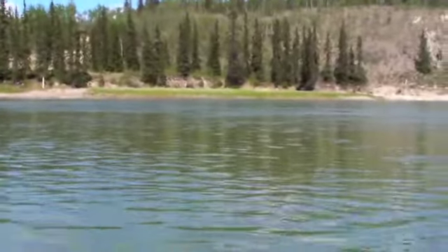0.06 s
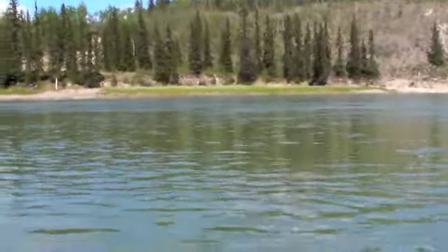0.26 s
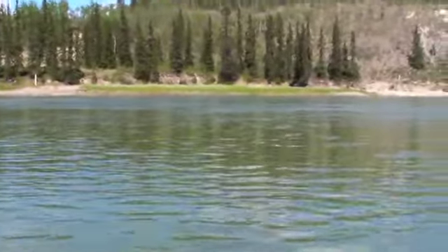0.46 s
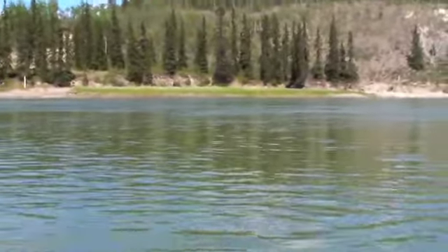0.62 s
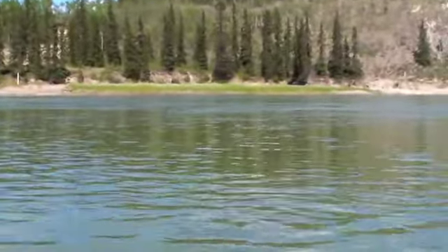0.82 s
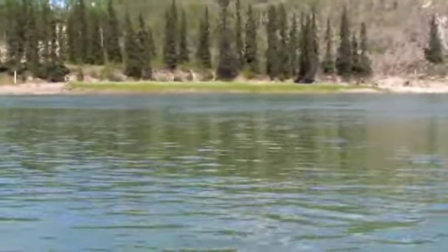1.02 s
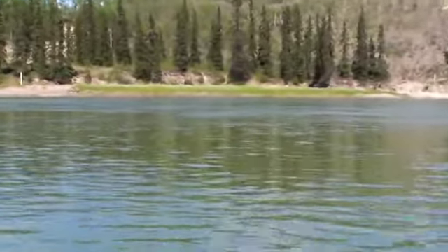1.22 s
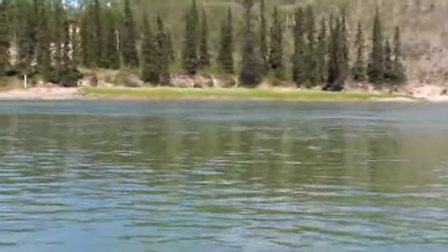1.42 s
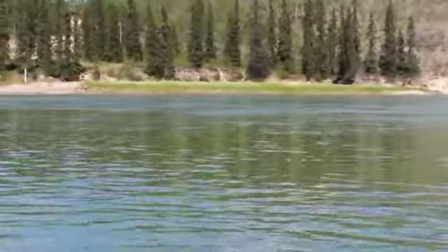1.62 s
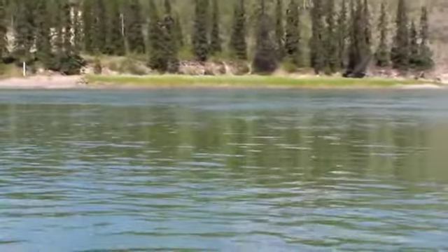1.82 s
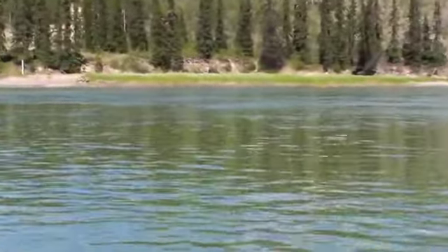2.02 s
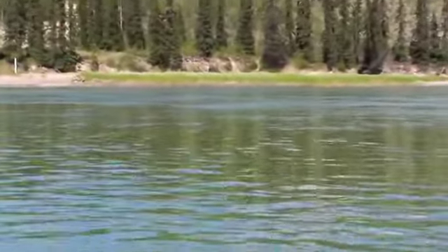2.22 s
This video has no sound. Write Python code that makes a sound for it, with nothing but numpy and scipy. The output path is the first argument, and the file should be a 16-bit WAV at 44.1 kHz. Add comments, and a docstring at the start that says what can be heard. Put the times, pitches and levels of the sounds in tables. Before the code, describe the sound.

Something knocks hard on the hull of a drifting boat, close to the microphone, followed by softer bumps. Faint river water hisses throughout, light wind rumbles on the microphone, and a small bird on the bank chirps, growing louder.

```python
"""On a wide river, in a drifting boat. Water hisses as broadband noise and stirs the hull's resonances
into a murmur, while light puffs of wind press on the microphone. On the bank a small bird alternates
a thin high note and a fuller arched chirp, gliding pure tones that grow louder each time.
Among a few small ticks, something knocks on the hull, once hard, then more softly, exciting its modes."""
import sys
import numpy as np
from scipy import signal
from scipy.io import wavfile

SR = 44100
rng = np.random.default_rng(int(sys.argv[2]) if len(sys.argv) > 2 else 0)


def to_wav(s):
    """Save 16-bit WAV."""
    ch = np.atleast_2d(s).T  # columns
    pcm = np.round(np.clip(ch, -1, 1) * 32767)  # PCM
    wavfile.write(sys.argv[1], SR, pcm.astype(np.int16))


N = 103635
TIME = np.arange(N) / SR


def from_db(db):
    """Amplitude ratio: tenfold for every 20 dB."""
    return 10 ** (np.asarray(db) / 20)


def unit_rms(x):
    """Normalisation to unit mean power."""
    return x / np.sqrt(np.mean(x ** 2) + 1e-20)


def envelope(points):
    """Amplitude envelope, linear in decibels between (time, level) points."""
    return from_db(np.interp(TIME, *np.transpose(points)))


def at_hz(points, hz):
    """Interpolation on a logarithmic frequency axis."""
    freqs, values = np.transpose(points)
    return np.interp(np.log(hz), np.log(freqs), values)


def drift(rate_hz):
    """Random modulation: low-passed Gaussian noise of unit rms."""
    step = 40   # samples per control point
    r = np.exp(-2 * np.pi * step * rate_hz / SR)
    slow = signal.lfilter([1], [1, -2 * r, r * r], rng.standard_normal(N // step + 2002))[2000:]
    return np.interp(np.arange(N) / step, np.arange(len(slow)), unit_rms(slow))


def cut(x, hz, kind, order=2):
    """Butterworth filter: a flat passband, then 6 dB per octave for each order."""
    return signal.sosfilt(signal.butter(order, hz, kind, fs=SR, output="sos"), x + 1e-18)


def ring(drive, modes):
    """Modal superposition: each mode responds as a damped harmonic oscillator."""
    out = 0
    for hz, db, t60 in modes:
        r, w = from_db(-60 / (t60 * SR)), 2 * np.pi * hz / SR
        out += from_db(db) * signal.lfilter([0, np.sin(w)], [1, -2 * r * np.cos(w), r * r], drive + 1e-18)
    return out


def decay(start, t60):
    """Exponential decay, falling 60 dB in t60 seconds."""
    return (TIME >= start) * np.exp(-np.log(1000) * np.maximum(TIME - start, 0) / t60)


def place(x, pan_db, lag_s=0):
    """Localisation by level and time difference; positive values favour the left."""
    return np.array([x * from_db(pan_db / 2), np.interp(TIME - lag_s, TIME, x) * from_db(-pan_db / 2)])


# Coherence of the noise field. Each row: frequency in Hz, left-right correlation.
COHERENCE = [(40, 0.27), (120, 0.78), (400, 0.66), (800, 0.81), (1500, 0.6), (3100, 0.48), (6500, 0.025),
             (15000, -0.19)]
# Its balance. Each row: frequency in Hz, left minus right level in dB.
NOISE_BALANCE = [(40, -4), (120, 0), (400, 1.5), (1500, -0.5), (5000, 0.5), (15000, -1)]

def banded_noise(spectrum, flicker_db):
    """Partially coherent stereo noise of unit rms, in half-octave bands that flicker independently."""
    out, edges = 0, np.geomspace(24, 17500, 20)
    white = rng.standard_normal((2, 2, N))
    sides = np.array([[1], [-1]])
    for k, (low, high) in enumerate(zip(edges, edges[1:])):
        mid, side = cut(white[k % 2], [low, high], "band")
        hz = np.sqrt(low * high)
        alike = at_hz(COHERENCE, hz)
        gain = from_db(at_hz(spectrum, hz) + flicker_db * drift(11.3))
        balance = from_db(sides * at_hz(NOISE_BALANCE, hz) / 2)
        out += gain * balance * (np.sqrt(1 + alike) * mid + np.sqrt(1 - alike) * side * sides)
    return unit_rms(out)


# Spectrum of the hiss. Each row: frequency in Hz, relative band level in dB.
RIVER_SPECTRUM = [(100, -13), (170, -2.5), (270, -15.5), (400, -1.5), (600, -7.5), (1000, -9.5),
                  (1600, -13.5), (4000, -13.5), (5200, -19), (10000, -20.5), (15000, -24), (16500, -28)]
# Hull modes stirred by water. Each row: frequency in Hz, gain in dB, 60 dB decay time in seconds.
MURMUR_MODES = [(371, -4.5, 0.067), (400.6, 3, 0.12), (445.7, 2, 0.11), (515, -1.5, 0.048)]
# Course of the murmur. Each row: time in seconds, level in dB.
MURMUR_ENVELOPE = [(0, -61), (.45, -61.5), (.75, -64.5), (1.38, -62.5), (1.68, -66), (2.35, -66)]

def water():
    """Forced vibration: the river hisses evenly and drives the hull at random into a hollow murmur."""
    stirring = np.diff(rng.standard_normal(N + 1))
    murmur = envelope(MURMUR_ENVELOPE) * unit_rms(ring(stirring, MURMUR_MODES))
    return from_db(-59) * banded_noise(RIVER_SPECTRUM, flicker_db=1.23) + murmur


# Swells of the murmur. Each row: peak time in seconds, level in dB, pitch in Hz, half-width in seconds.
HUM_SWELLS = [(1.821, -55.5, 391, 0.027), (1.992, -53, 400, 0.027)]

def hums(sag_hz_per_s=700):
    """Linear frequency sweeps under Gaussian envelopes: faint, brief hums that sag in pitch."""
    out = 0
    for peak, db, hz, half_s in HUM_SWELLS:
        age = TIME - peak
        phase = 2 * np.pi * age * (hz - sag_hz_per_s * age / 2)
        out += from_db(db) * np.exp(-(age / half_s) ** 2 / 2) * np.sin(phase)
    return out


# Puffs on the microphone. Each row: centre time in seconds, level in dB, frequency in Hz.
WIND_PUFFS = [(1.577, -40.5, 95), (1.627, -49, 94), (1.854, -43, 76), (1.872, -43.5, 99),
              (1.954, -52, 83.4)]
# Course of the rumble. Each row: time in seconds, level in dB.
WIND_ENVELOPE = [(0, -65), (.45, -58.5), (.75, -71), (.95, -61), (1.25, -63.5), (1.45, -57), (1.8, -58),
                 (2.05, -57), (2.18, -71), (2.33, -60)]
# Spectrum of the rumble. Each row: frequency in Hz, relative band level in dB.
WIND_SPECTRUM = [(25, -33), (45, 0.5), (75, 2), (120, 3), (200, -11), (350, -38), (800, -36)]

def wind(puff_half_cycles=.52):
    """Pressure fluctuations at the microphone: a lumpy low rumble with a few single swings."""
    puffs = 0
    for centre, db, hz in WIND_PUFFS:
        cycles = (TIME - centre) * hz
        puffs -= from_db(db) * np.exp(-(cycles / puff_half_cycles) ** 2 / 2) * np.sin(2 * np.pi * cycles)
    rumble = envelope(WIND_ENVELOPE) * banded_noise(WIND_SPECTRUM, flicker_db=2.5)
    return place(puffs, pan_db=-11.5, lag_s=.0015) + rumble


def whistles(notes, contour, waver=.007, flutter_db=2.3):
    """Frequency and amplitude modulation: a pure tone traces one contour per note, fluttering slightly."""
    out = 0
    offset, ratio, contour_db = np.transpose(contour)
    for crest, db, hz, stretch in notes:
        age = (TIME - crest) / stretch
        pitch = hz * np.interp(age, offset, ratio) * (1 + waver * drift(152))
        level = from_db(db + np.interp(age, offset, contour_db) + flutter_db * drift(160))
        sounding = (age > offset[0]) * (age < offset[-1])
        out += level * sounding * np.sin(2 * np.pi * np.cumsum(pitch) / SR)
    return out


# The two kinds of note. Each row: crest time in seconds, level in dB, held pitch in Hz, time stretch.
ARCHED_NOTES = [(1.603, -56.5, 4410, .92), (1.830, -54.5, 4510, .88), (2.058, -50.5, 4420, 1),
                (2.287, -45, 4420, 0.97)]
THIN_NOTES = [(1.49, -70, 5320, 1), (1.714, -69, 5120, 1.3), (1.946, -63.5, 5130, 1.12),
              (2.177, -57.5, 5030, 1)]
# Their contours. Each row: unstretched seconds from the crest, ratio to the held pitch, gain in dB.
ARCHED_CONTOUR = [(-.030, .86, -17), (-.016, .85, -5), (-.009, .95, -13), (-.003, 1.09, -4),
                  (.002, 1.11, -5), (.013, 1.025, -6), (.023, 1.01, -7), (.028, 1.01, -12), (.034, 1, 1),
                  (.051, 1, -2.5), (.064, 1, -27)]
THIN_CONTOUR = [(-.020, 1.2, -25), (-.011, 1.13, -4), (0, 1.27, -18), (.013, 1.03, -2), (.023, .98, -4),
                (.042, 1, 0), (0.05, 1.02, -7), (.056, 1.06, -1), (.064, 1, -4), (.071, 0.89, -24)]

def bird():
    """Direct sound plus scattering: two notes alternate on the right, echoed faintly by the trees."""
    song = place(whistles(ARCHED_NOTES, ARCHED_CONTOUR), pan_db=-3.5, lag_s=.00004)
    song += place(whistles(THIN_NOTES, THIN_CONTOUR), pan_db=-10, lag_s=.00004)
    scatter = unit_rms(rng.standard_normal((2, N)) * decay(start=.015, t60=.34)) / np.sqrt(N)
    return song + from_db(-10) * signal.fftconvolve(song, scatter, axes=1)[:, :N]


# Small ticks. Each row: start in seconds, level in dB, centre in Hz, width in octaves,
# 60 dB decay time in seconds, pan in dB.
TICK_BURSTS = [(.1072, -38.5, 3150, 0.46, 0.0066, 6), (.1395, -49, 4170, 1.8, 0.015, -1),
               (.888, -56.5, 2560, 1.5, 0.068, 0), (1.378, -51.5, 6300, 1.2, 0.017, 4),
               (1.4608, -47, 7760, 1.5, 0.01, 0), (1.4612, -46, 11200, .55, 0.0054, 2.5),
               (2.066, -55, 2440, 1, 0.051, 3)]

def ticks(rise_share=.082):
    """Band-limited transients: noise bursts that rise linearly and decay exponentially."""
    out = 0
    for start, db, hz, octaves, t60, pan_db in TICK_BURSTS:
        edges = hz * 2 ** (np.array([-.5, .5]) * octaves)
        rise = rise_share * t60
        attack = np.clip((TIME - start) / rise, 0, 1) * (TIME < start + rise)
        burst = rng.standard_normal(N) * (attack + decay(start + rise, t60))
        burst *= np.sqrt(SR / 2 / np.diff(edges))   # equal power at any bandwidth
        snap = cut(cut(burst, edges, "band"), edges, "band")
        out += place(from_db(db) * snap, pan_db)
    return out


# Blows on the hull. Each row: time in seconds, push in dB, click in dB, hardness as a cut-off in Hz.
BLOWS = [(.2116, -19.5, -16.5, 577), (.275, -38.5, -80, 240), (0.3776, -34, -76, 425),
         (1.362, -51, -80, 420)]
# Modes of the hull and of the hard contact. Each row: frequency in Hz, gain in dB,
# 60 dB decay time in seconds.
HULL_MODES = [(129, -8.5, .11), (171.2, -17.5, 0.31), (312, -22, 0.045), (353, 1, 0.065), (404, -8, 0.095),
              (504.4, -6.5, 0.075), (806, -17.5, 0.13), (1126, -6, 0.11)]
CONTACT_MODES = [(1570, -24, 0.018), (2200, -19, 0.015), (2810, -12, 0.016), (3530, -2.5, 0.007),
                 (5160, -4.5, .007), (8130, -10.5, 0.005), (11300, -12.5, 0.0039), (13400, -16, 0.0027)]
# Diffuse ring of the boat. Each row: frequency in Hz, relative band level in dB.
RATTLE_SPECTRUM = [(300, -18), (650, -6), (950, 4.5), (1500, 3.5), (2300, 1), (3600, -3), (6000, -9.5),
                   (8300, -5), (9700, -24), (11500, -20), (16000, -29)]

def knocks(click_lead_s=.002, rebound_s=.0149, rattle_db=-16, pan_spread_db=1.2):
    """Impact excitation: each blow clicks, sets the hull's modes ringing and leaves a diffuse tail."""
    push, impulses, tail = 0, 0, 0
    for start, push_db, click_db, hardness_hz in BLOWS:
        blow = signal.unit_impulse(N, int(start * SR))
        push += from_db(push_db) * cut(blow, hardness_hz, "low", order=4)
        touch = start - click_lead_s
        impulses += from_db(click_db) * signal.unit_impulse(N, int(touch * SR))
        tail += from_db(click_db + rattle_db) * decay(touch, t60=.084)
    rebound = np.interp(TIME - rebound_s, TIME, push)
    push += from_db(-4) * cut(rebound, 1300, "low", order=1)   # each blow lands again, duller
    body = 0
    for mode in HULL_MODES:   # each mode reaches the two sides a little differently
        body += place(ring(push, [mode]), pan_spread_db * rng.standard_normal(), lag_s=-.00002)
    impulses = cut(impulses, 13800, "low")
    click = ring(impulses, CONTACT_MODES[::2]) - ring(impulses, CONTACT_MODES[1::2])   # signs alternate
    rattle = tail * banded_noise(RATTLE_SPECTRUM, flicker_db=.5)
    hull = cut(body + rattle, 118, "high", order=4)   # the hull radiates little deep bass
    return hull + place(click, pan_db=5, lag_s=.000282)


def scene():
    """Superposition: the pressures of all sources add at the boat."""
    return knocks() + ticks() + bird() + wind() + water() + hums()


def record(dry, cutoff_hz=16000):
    """Band limiting: an elliptic low-pass cuts the highest treble steeply."""
    return signal.sosfilt(signal.ellip(10, .1, 70, cutoff_hz, fs=SR, output="sos"), dry)


dry = scene()
out = record(dry)
to_wav(out)
```